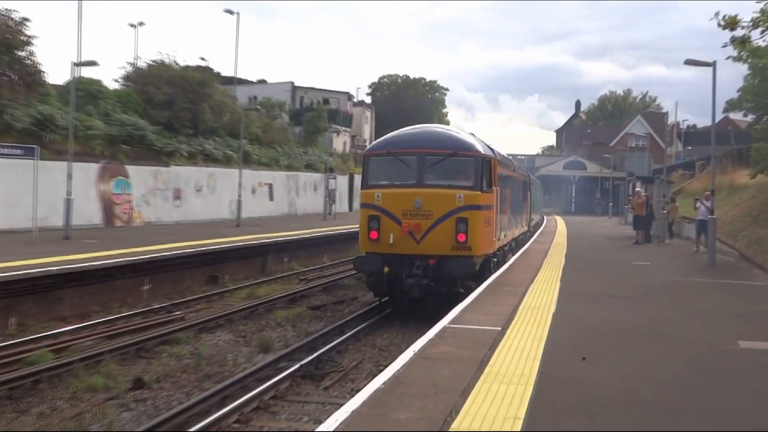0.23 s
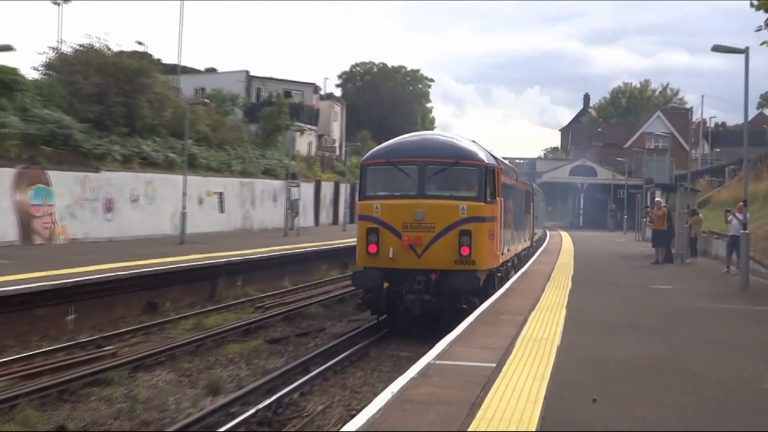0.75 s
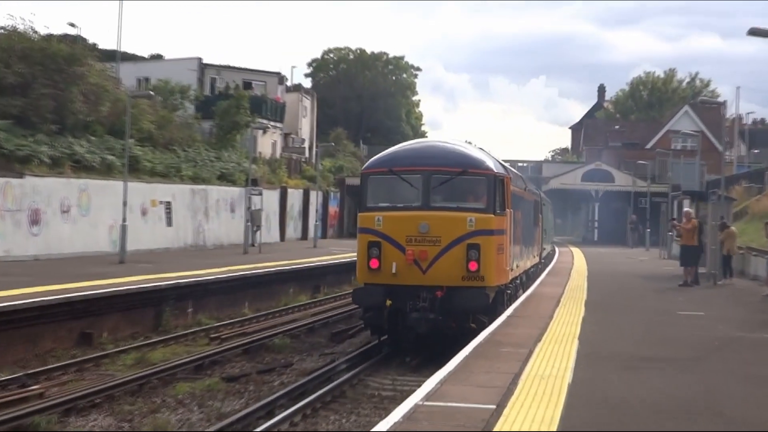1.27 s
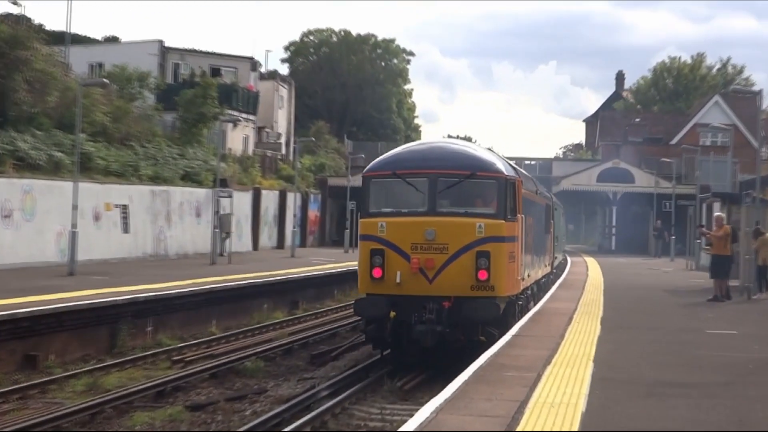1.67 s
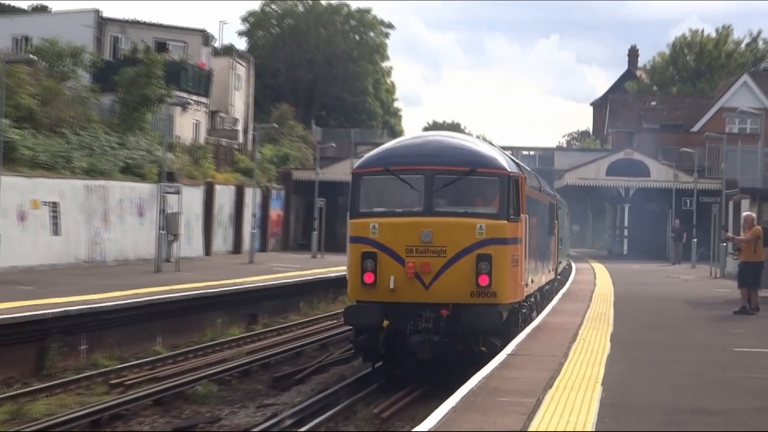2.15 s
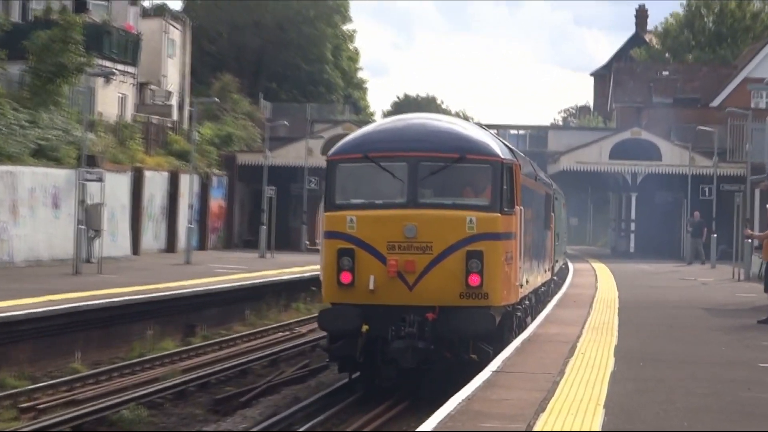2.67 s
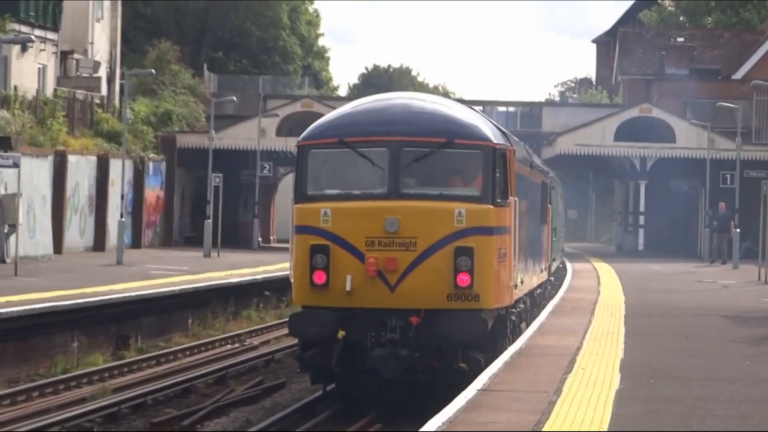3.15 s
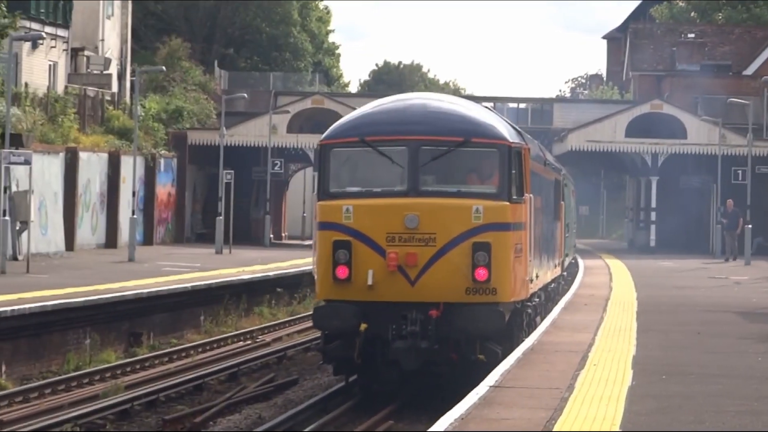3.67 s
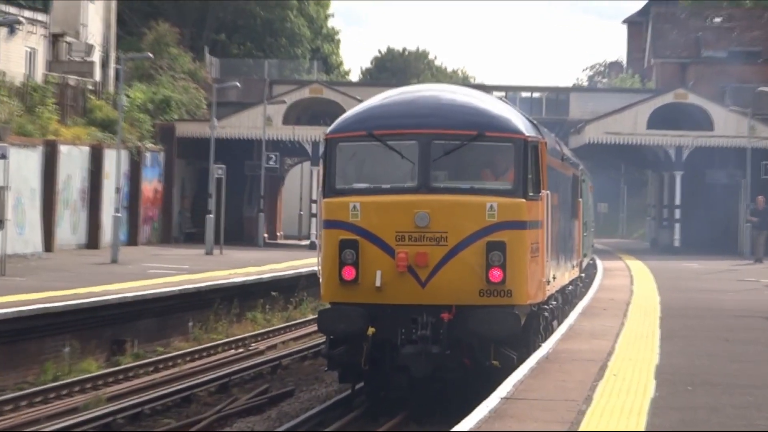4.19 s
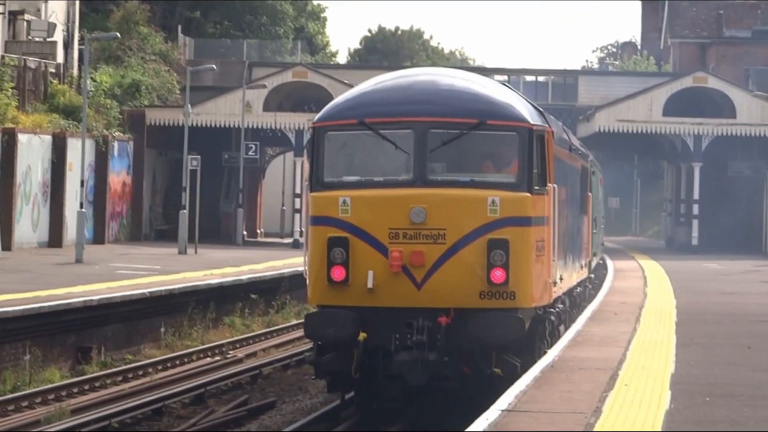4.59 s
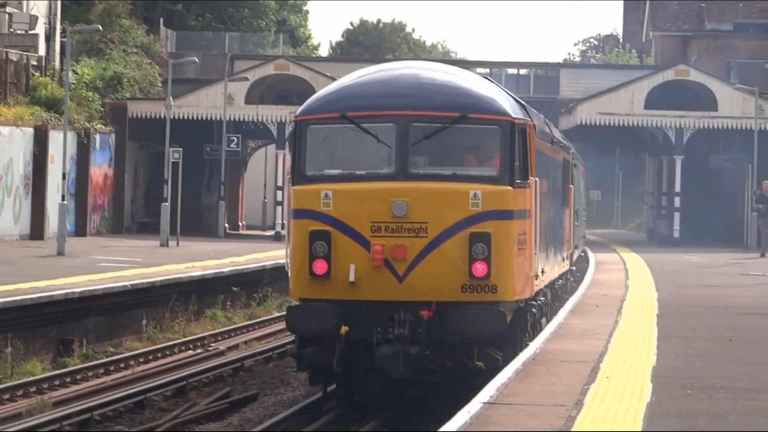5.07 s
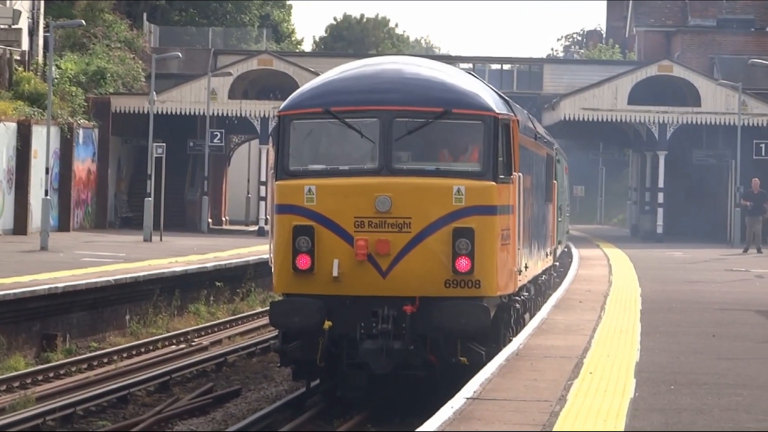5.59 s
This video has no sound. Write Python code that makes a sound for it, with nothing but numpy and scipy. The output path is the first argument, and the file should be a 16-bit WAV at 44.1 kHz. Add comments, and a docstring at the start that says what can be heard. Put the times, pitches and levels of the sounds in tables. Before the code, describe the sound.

A steady, piercing wheel squeal wavers over rolling train noise, breaks into short, differently pitched squeals, then leaves low running gear and engine whine.

```python
"""Train leaving round a curved platform

A diesel-hauled train rolls slowly away round the curve of a station platform.
Its wheel flanges squeal as wavering tones, echoed by the platforms, and grind as shaped noise.
Rumble, running gear, the rails' roar and a brief air hiss are noise too, each with its own colour.
The rear locomotive's engine is a throb of beating tones under whines, plainer towards the end.
Small sharp ticks are very short rings."""
import sys
import numpy as np
from scipy import signal
from scipy.fft import next_fast_len
from scipy.io import wavfile
from scipy.ndimage import uniform_filter1d

SR = 44100
rng = np.random.default_rng(int(sys.argv[2]) if len(sys.argv) > 2 else 0)


def digitize_waveform(pressure):
    """Quantize a signal to 16-bit integers and store it at the path in sys.argv[1].

    Rows of a 2-D input are taken as channels; values are limited to [-1, 1].
    """
    field = np.atleast_2d(pressure).T
    bounded = np.clip(field, -1, 1)
    quanta = np.round(bounded * 32767).astype(np.int16)
    wavfile.write(sys.argv[1], SR, quanta)


N = 257544
TIME = np.arange(N) / SR  # s
EDGE_HZ = 15900  # top of the sound's band


def gain_of(db):
    """Turns decibels into amplitude."""
    return 10 ** (np.asarray(db) / 20)


def evened(x):
    """Scales a signal to rms 1."""
    return x / np.sqrt(np.mean(abs(x) ** 2) + 1e-20)


def curve(rows, order=1):
    """Draws straight lines through one column of a time table, giving a value at every sample."""
    rows = np.asarray(rows)
    return np.interp(TIME, rows[:, 0], rows[:, order])


def read(points, hz, order=1):
    """Reads one column of a spectrum table along a log-frequency axis."""
    points = np.asarray(points)
    return np.interp(np.log(hz + 1), np.log(points[:, 0] + 1), points[:, order])


def during(start, end, rise, fall, shape=2):
    """Is 1 between two times, swelling before and dying away after."""
    before = (start - TIME) / rise
    after = (TIME - end) / fall
    return np.exp(-np.maximum(np.maximum(before, after), 0) ** shape)


def drift(hz, steep=2):
    """Makes complex random motion of rms 1, mostly slower than about hz."""
    size = next_fast_len(N)
    white = rng.standard_normal(size) + 1j * rng.standard_normal(size)
    shape = (1 + (np.fft.fftfreq(size, 1 / SR) / hz) ** 2) ** (-steep / 2)
    return evened(np.fft.ifft(white * shape)[:N])


def tone(hz, wander_hz, wander_rate=12):
    """Makes a complex tone whose pitch wanders by wander_hz rms; wander_rate is in Hz."""
    pitch = hz + wander_hz * evened(drift(wander_rate).real)
    return np.exp(2j * np.pi * np.cumsum(pitch) / SR)


def placed(z, balance_db, lead):
    """Places a complex tone in stereo: left-right level in dB, lead of the left in radians."""
    half = gain_of(balance_db / 2) * np.exp(.5j * lead)
    return np.sqrt(2) * np.array([(z * half).real, (z / half).real])


def noise(colour, patchy_db, modes=(), size=1024):
    """Makes stereo noise of rms 1, with resonances and patches that change over time and pitch."""
    # how noise lies between left and right:
    # f/Hz, left-right level/dB, left lead/rad, likeness of left and right (0-1)
    stereo_image = [(200, 0, 0, 1), (380, -1.1, 0.085, 0.98), (700, -1.5, 0.27, 0.98),
                    (1100, -2, 0.46, 0.94), (1400, 1, 0, 1), (1895, -0.1, 0.062, 1),
                    (2980, -2, -0.95, 0.87), (4440, 8.5, 0.42, 0.82), (6200, -1.5, -0.23, 0.99),
                    (8100, -4.5, 0.08, 0.74), (11000, 0.5, 0, 1)]
    hop, hz = size // 4, np.fft.rfftfreq(size, 1 / SR)
    a, b, c, d, patches = rng.standard_normal((5, N // hop + 5, len(hz)))

    # smooth the patches over time, then over frequency
    patches = uniform_filter1d(patches, size=9, axis=0)
    patches = evened(uniform_filter1d(patches, size=12, axis=1))

    # the right channel mixes the left one with noise of its own
    same = np.clip(read(stereo_image, hz, order=3), -1, 1)
    left, other = a + 1j * b, c + 1j * d
    right = same * left + np.sqrt(1 - same ** 2) * other
    half = gain_of(read(stereo_image, hz) / 2) * np.exp(.5j * read(stereo_image, hz, order=2))
    z = np.array([left * half, right / half])

    shape_db = read(colour, hz)
    for f, width, lift_db in modes:
        shape_db = shape_db + lift_db / (1 + (2 * (hz - f) / width) ** 2)
    spectra = np.swapaxes(z * gain_of(shape_db + patchy_db * patches), 1, 2)
    return evened(signal.istft(spectra, nperseg=size, noverlap=size - hop)[1][:, :N])


def excitation(mode):
    """A wheel mode swells, holds while its flange slips, and dies; gives its amplitude over time."""
    # squeals: mode, held from t/s, to t/s, level/dB, rise/s, fall/s
    squeals = [ ("lead", 0, 3.72, -18.5, .1, .16), ("lead", 4.02, 4.04, -33, .03, 0.023),
               ("lead", 4.145, 4.19, -29.5, 0.048, 0.086), ("lead", 4.35, 4.37, -32.5, .03, 0.067),
               ("lead", 4.55, 4.7, -46, .1, .15), ("low", 3.77, 3.87, -38, 0.32, 0.095),
               ("low", 4.22, 4.32, -48.5, .08, .05), ("low", 4.54, 4.58, -32, .05, .035),
               ("low", 4.68, 4.82, -39, 0.043, 0.11), ("mid", 4.18, 4.23, -23, .07, 0.042),
               ("mid", 4.295, 4.376, -22, 0.027, 0.067), ("mid", 4.59, 4.6, -34.5, 0.079, 0.18),
               ("late", 4.69, 4.86, -48, 0.044, 0.046), ("late", 5.07, 5.09, -43, .045, 0.016),
               ("late", 5.16, 5.17, -41.5, 0.033, .1), ("upper", 4.11, 4.12, -41, 0.019, .02),
               ("upper", 4.23, 4.38, -36.5, .045, .04), ("upper", 4.47, 4.54, -39.5, .05, .025),
               ("high", 2.89, 3.02, -44.5, 0.46, .08), ("high", 3.22, 4.01, -38, 0.088, 0.18),
               ("high", 4.495, 4.58, -31, 0.14, 0.086), ("high", 4.72, 4.75, -29, 0.045, 0.016),
               ("high", 4.84, 4.87, -30.5, 0.041, .06), ("high", 5.02, 5.024, -40, .05, 0.1),
               ("top", 3.88, 4.41, -33.7, 0.39, .29)]
    swell_shape = 1.35  # 1 = exponential rise and fall, 2 = bell-shaped
    power = 0
    for name, start, end, db, rise, fall in squeals:
        if name == mode:
            power = power + (gain_of(db) * during(start, end, rise, fall, swell_shape)) ** 2
    return np.sqrt(power)


def lead_squeal(wander_hz=12, echo=0.91, ceiling=2.12, second_db=-33, third_db=-42):
    """Three wheels stick and slip at nearly one pitch and beat against each other and their echoes."""
    # pitch of the three wheels: t/s, centre f/Hz, nominal spread to either side/Hz, added level/dB
    lead_wheels = [(0, 4580, 70.4, -0.9), (1.3, 4594, 57, .3), (2.2, 4608, 43, 1),
                   (2.75, 4605, 39.5, -1.19), (3.1, 4620, 30, -0.65), (3.5, 4639, 12, .3),
                   (4.8, 4648, 8, 0)]
    centre, spread = curve(lead_wheels), curve(lead_wheels, order=2)
    wheels = 0
    # side scales the spread, loose scales the pitch wander
    for side, size, loose in [(-1.1, 0.97, 1.693), (0, 1.08, 1.03), (0.93, 0.96, .25)]:
        wheels = wheels + size * tone(centre + side * spread, wander_hz * loose)

    # widely spread wheels smear into a broader band of echoes
    broad = np.clip(spread / spread.max(), 0, 1)
    smear = broad * drift(100, steep=2.2) + np.sqrt(1 - broad ** 2) * drift(45, steep=3.6)
    z = evened(wheels) + echo * smear * tone(centre, 3.03)
    # a soft ceiling holds the peaks down
    z = evened(z / (1 + (abs(z) / ceiling) ** 4) ** (1 / 4))
    level = excitation("lead") * gain_of(curve(lead_wheels, order=3))

    # the slip is not a pure sine: weak overtones follow it
    turn = z / (abs(z) + 1e-9)
    second = gain_of(second_db) * z * turn
    third = gain_of(third_db) * z * turn ** 2 * during(.6, 3.75, .2, .1)
    return placed(level * z, 1.9, 0.55) + placed(level * (second + third), -1.5, 0)


def wheel_rings(apart=0.15, steep=3):
    """Other wheel modes join in: wavering tones with overtones and a flutter of echoes."""
    # wheel modes: mode, f/Hz, pitch wander/Hz, echo width/Hz, echo share of power (0-1),
    # second partial level/dB, third partial level/dB, left-right level/dB, left lead/rad
    wheel_modes = [ ("low", 3175, 20, 59, 1, -18, -14, -.7, -0.95),
                   ("mid", 4926, 8, 44, 0.33, -30, -39, -.4, .4),
                   ("late", 5194, 5.8, 22, 0.41, -44, -55, 0, .1),
                   ("upper", 5527, 9.1, 38, 0.52, -39, -45, -.8, .26),
                   ("high", 6361, 7, 51, 0.56, -38, -60, .6, -0.48),
                   ("top", 10454, 8, 44, 0.6, -60, -60, -1.1, -.36)]
    out = np.zeros((2, N))
    for mode, hz, wander_hz, width_hz, share, second_db, third_db, balance_db, lead in wheel_modes:
        share, turn = np.clip(share, 0, 1), tone(hz, wander_hz)
        partials = 0
        for k, db in enumerate([0, second_db, third_db], 1):
            if k * hz < EDGE_HZ:
                partials = partials + gain_of(db) * turn ** k
        ring = partials * excitation(mode)
        echoed = np.sqrt(1 - share) + np.sqrt(share) * drift(width_hz, steep)
        out += placed(ring * echoed, balance_db, lead)
        # late reflections are opposite left and right, and stronger the shorter the wave
        late = ring * drift(width_hz, steep) * apart * (hz / 6000) ** 2
        out += placed(late, 0, np.pi)
    return out


def squeaks(wander_hz=14, flutter=.55, tail=.3):
    """A flange catches for a moment: a tone swells, slides, and dies away in its echo."""
    # brief squeaks: t/s, length/s, f/Hz, glide over one length/Hz, level before flutter/dB
    brief_squeaks = [(1.358, .12, 6030, 0, -42.5), (2.732, .08, 5960, 56, -46),
                     (2.784, 0.099, 3820, 0, -42.5), (2.794, .08, 5270, -13, -42),
                     (2.95, 0.12, 7010, 1.5, -47), (3.76, 0.084, 7020, 3, -51), (4.33, 0.18, 8150, 0, -54),
                     (4.48, 0.41, 9400, 4.5, -49.5), (4.672, 0.041, 5800, -70, -50),
                     (4.69, 0.16, 8070, 2, -47), (4.78, .08, 5490, -20, -44),
                     (4.814, 0.16, 875, -1.5, -39.5), (4.82, 0.12, 6275, 12, -38),
                     (4.895, 0.082, 4715, -37, -43), (4.957, 0.042, 4860, 30.5, -44),
                     (4.964, .04, 5490, -2, -51), (5.412, .05, 9650, 250, -60)]
    shiver = tone(0, wander_hz, 36.7) * (1 + flutter * drift(45))
    out = 0
    for s, length, hz, glide_hz, db in brief_squeaks:
        u = (TIME - s) / length
        swell = np.exp(-(2 * u) ** 2)
        echo = tail * (u > 0) * (1 - swell) * np.exp(-abs(TIME - s) / .06)
        pitch = hz + glide_hz * np.clip(u, -1, .5)
        out = out + gain_of(db) * (swell + echo) * np.exp(2j * np.pi * np.cumsum(pitch) / SR)
    return placed(out * shiver, 0, 0)


def grinding(flicker_db=2.5):
    """Flanges scrape the rail unevenly and excite the wheels' resonances."""
    # colour of the scraping: f/Hz, relative level per Hz/dB
    grind_colour = [(1500, -24), (2800, -4.5), (3500, -3), (5100, 4), (6000, -0.5), (6600, -8.5),
                    (8000, -3), (8700, -6), (9500, -3), (10200, -31), (11500, -16.5), (15000, -31),
                    (16000, -29)]
    # wheel resonances that colour it: f/Hz, width/Hz, lift/dB
    grind_modes = [(3100, 150, 10), (3740, 300, 8), (4460, 47, 5), (6110, 340, 8), (7000, 130, 13),
                   (7720, 210, 7), (8070, 88, 5.5), (9170, 260, 12)]
    # how hard the flanges scrape: t/s, level before flicker/dB
    scrape = [(0, -33.5), (1.3, -34), (2.2, -38.5), (2.8, -37.5), (3.1, -43.5), (3.8, -43), (4.05, -51),
              (4.45, -46.5), (5.2, -56.5), (5.84, -58.5)]
    level_db = curve(scrape) + flicker_db * drift(32).real
    return noise(grind_colour, 1.94, grind_modes) * gain_of(level_db)


def rolling():
    """Rumble of the vehicles, their running gear, and the rails' roar, which changes colour."""
    # colours of the four noises: f/Hz, relative level per Hz/dB
    rumble_colour, gear_colour = [(20, -25.5), (30, -17), (40, -4.5), (52, -9), (85, -2), (130, -0.5),
                                  (220, 4.5), (300, 2), (450, -21), (1500, -57.5)], [(120, -35.5), (250, -15.5), (340, -3.5), (410, -5.5),
                                                  (480, -3), (660, 1.5), (800, -4.5), (920, -5.5),
                                                  (1150, -8.5), (1500, -27), (3000, -38), (5000, -28),
                                                  (9000, -50), (15000, -52)]
    near_colour, far_colour = [(700, -29), (1100, -16), (1350, -10.5), (1600, -0.5), (1880, 2), (2150, -1),
                               (2400, 0), (2600, -11.5), (2900, -23.5), (4500, -36), (9000, -71)], [(700, -41), (1100, -13), (1300, -7.5), (1520, -1.5),
                                                  (1800, -1), (2080, 1), (2240, -10.5), (2400, -6.5),
                                                  (2600, -17), (2900, -19.5), (4400, -25.5), (6500, -42.5),
                                                  (15000, -58.5)]
    # body resonances that colour the running gear: f/Hz, width/Hz, lift/dB
    gear_modes = [(370.6, 13, 5), (467, 18, 4.5), (502, 9.8, 4), (548, 9.9, 2.5), (576.4, 10, 6),
                  (628, 9.7, 3), (719, 19, 4.5)]
    # levels as the vehicles draw away, before surges and shaking:
    # t/s, rumble level/dB, running gear level/dB, roar level/dB
    levels = [(0, -52, -39, -23.5), (1.2, -52.5, -42.5, -26.5), (2.1, -57.5, -45, -29.5),
              (3.3, -54.5, -40.5, -32.5), (4.35, -55, -37.5, -34), (4.9, -51.5, -34.5, -31),
              (5.84, -51, -32.5, -28.5)]
    # wheels run over rough stretches of rail: t/s, half length/s, rumble lift/dB, roar lift/dB
    surges = [(.13, 0.094, 4.5, -1.5), (0.855, .05, 0, 2.5), (1.25, 0.11, -2, 3), (1.76, .08, -2, 3.5),
              (4.592, 0.069, 0, 4), (4.92, 0.08, 1, 2.5), (5.084, .1, 4.5, 1)]
    rumble_db, gear_db, roar_db = curve(levels), curve(levels, order=2), curve(levels, order=3)
    for s, half, rumble_lift_db, roar_lift_db in surges:
        swell = during(s, s, half, half)
        rumble_db = rumble_db + rumble_lift_db * swell
        roar_db = roar_db + roar_lift_db * swell

    rumble = noise(rumble_colour, 1.2, size=4096) * gain_of(rumble_db)
    gear = noise(gear_colour, 1.0, gear_modes, size=4096) * gain_of(gear_db)
    # the near roar gives way to the far one
    far = np.clip((TIME - 2.2) / 2.23, 0, 1)
    roar = np.sqrt(1 - far) * noise(near_colour, 1.83) + np.sqrt(far) * noise(far_colour, 0.94)
    # uneven rail shakes all of them together
    shaking = gain_of(0.65 * drift(22).real)
    return (rumble + gear + roar * gain_of(roar_db)) * shaking


def engine(waver=0.001717):
    """Neighbouring shaft orders beat into a throb; turbocharger, fan and gears whine above."""
    # the rear engine, before the cuts and flutter below:
    # t/s, exhaust level/dB, turbocharger whine level/dB, fan whine level/dB
    engine_levels = [(0, -61, -41, -51), (.5, -64, -41, -45), (2.2, -69, -41, -51), (3, -64, -41, -48),
                     (3.75, -63, -40.5, -44.5), (4.1, -58, -35.5, -54), (4.6, -56.5, -40, -55),
                     (5.3, -54.5, -39, -41.5), (5.84, -50, -35, -44.5)]
    # exhaust tones: multiple of shaft speed, relative level/dB
    exhaust_orders = [(5, -12), (7, -14), (8, 0), (9, -5), (10, -15)]
    # whines of the locomotive's machinery: f/Hz, level before flutter/dB, from t/s, to t/s
    machine_whines = [(352.5, -54.5, 2.5, 6.5), (465, -53.5, 4, 6.5), (645, -53.5, 2.5, 6.5),
                      (690, -54, 4.5, 6.5), (1790, -43.5, 3, 4.7), (1817, -39, 5, 6.5),
                      (2308, -44.5, 0, 3.78), (2386, -42, 5, 6.5), (4310, -41.5, -0.5, .6),
                      (4350, -50.5, -1, 4.6), (4375, -49, 5.5, 6.5), (7400, -64, 5.5, 6.5),
                      (8100, -64, 3.5, 6.5)]

    shaft = tone(8.42, 0.033, 2)  # Hz: shaft speed, its wander, rate of wander
    exhaust = 0
    for k, db in exhaust_orders:
        exhaust = exhaust + gain_of(db) * shaft ** k * np.exp(2j * np.pi * rng.random())
    exhaust = evened(exhaust) * gain_of(curve(engine_levels) - 1.0)

    turbo = tone(1574, 3.72) * (1 + .5 * drift(8.1))
    turbo = turbo * gain_of(curve(engine_levels, order=2) - 1.5) * during(2.92, 6, 0.95, 1)

    fan_hz = curve([(0, 1049), (3.5, 1054), (5.84, 1063)])
    fan = tone(fan_hz, 4.88) * (1 + 1.2 * drift(23))
    fan = fan * gain_of(curve(engine_levels, order=3) - 3.5)

    whines = 0
    for hz, db, start, end in machine_whines:
        # the higher a whine, the faster it flutters
        flutter = 0.66 + 0.65 * drift(hz / 150)
        level = gain_of(db) * during(start, end, 0.16, .2)
        whines = whines + tone(hz, hz * waver) * flutter * level
    return placed(exhaust + turbo + fan + whines, -.1, .05)


def air_release():
    """An air valve opens with a rush, settles to a steady hiss and shuts, amid a faint leak."""
    # colour of the hiss: f/Hz, relative level per Hz/dB
    air_colour = [(1500, -18), (3800, -0.5), (6000, 5.5), (6700, -11), (7900, 5.5), (9300, -1.5),
                  (10300, -10), (14700, -8), (16000, -12)]
    open_s, shut_s, rise_s, fall_s = .272, .505, .014, .025
    flow_db, first_rush_db, rush_s = -32.5, 7.5, .085
    leak_from_s, leak_to_s, leak_fade_s, leak_db = .1, .88, .07, -42
    rush_db = first_rush_db * np.exp(-(np.maximum(TIME - open_s, 0) / rush_s) ** 2)
    flow = gain_of(flow_db + rush_db) * during(open_s, shut_s, rise_s, fall_s)
    leak = gain_of(leak_db) * during(leak_from_s, leak_to_s, leak_fade_s, leak_fade_s)
    return noise(air_colour, 0.89) * np.hypot(flow, leak)


def ticks(rise_s=0.000205):
    """Dry ticks: sines that swell and die within a few cycles, alike left and right."""
    # small sharp ticks: t/s, peak level of the swell/dB, f/Hz
    sharp_ticks = [(3.232, -31, 7600), (3.497, -24, 4200), (3.824, -21, 3900), (3.8237, -24, 7640),
                   (5.3015, -31.5, 8170), (5.5638, -32, 6200)]
    out = np.zeros(N)
    for s, db, hz in sharp_ticks:
        age = np.maximum(TIME - s, 0)
        swell = age / rise_s * np.exp(1 - age / rise_s)
        out += gain_of(db) * swell * np.sin(2 * np.pi * hz * age)
    return out


def scene():
    """Adds up the whole train as heard from the platform."""
    squealing = lead_squeal() + wheel_rings() + squeaks()
    return squealing + grinding() + rolling() + engine() + air_release() + ticks()


def record(dry):
    """Eases the very ends in and out and removes what lies above the band's top edge."""
    eased = dry * signal.windows.tukey(N, .001)
    low_pass = signal.firwin(511, EDGE_HZ, window=("kaiser", 9), fs=SR)
    return signal.oaconvolve(eased, low_pass[None], "same")


dry = scene()
out = record(dry)
digitize_waveform(out)
```